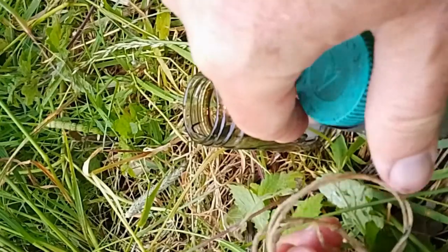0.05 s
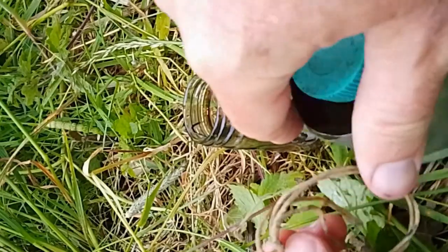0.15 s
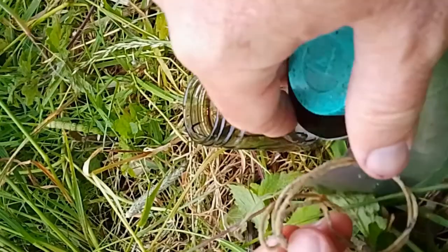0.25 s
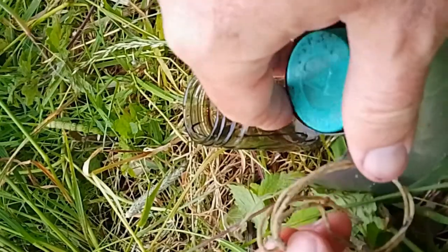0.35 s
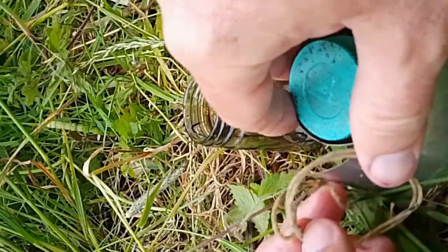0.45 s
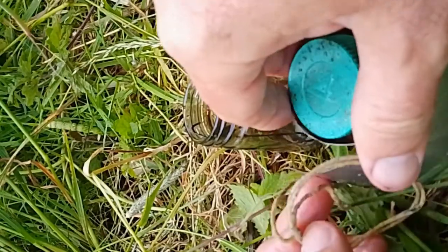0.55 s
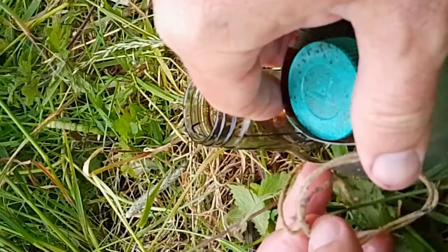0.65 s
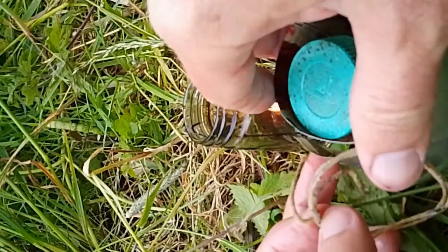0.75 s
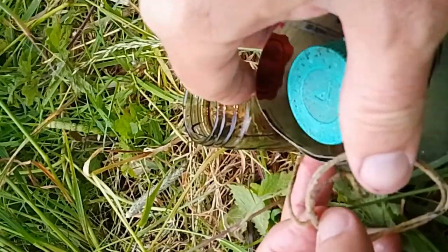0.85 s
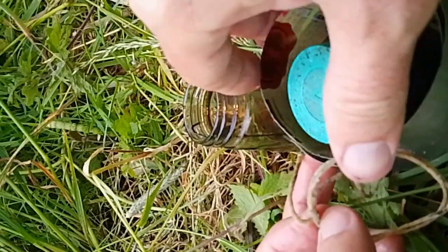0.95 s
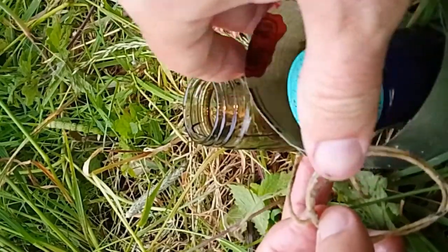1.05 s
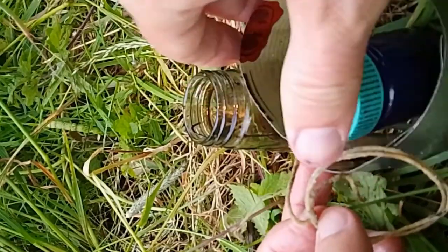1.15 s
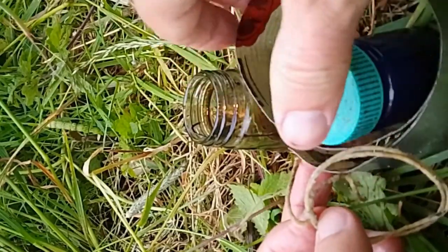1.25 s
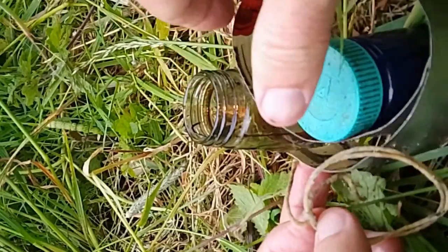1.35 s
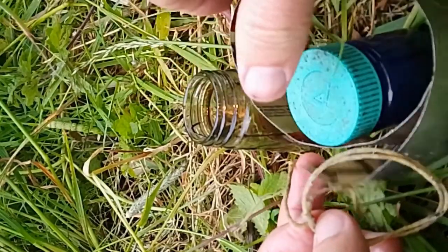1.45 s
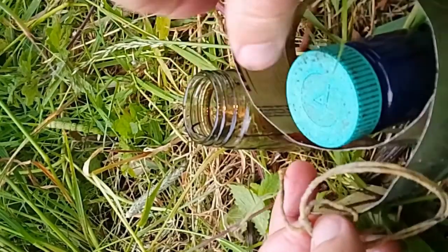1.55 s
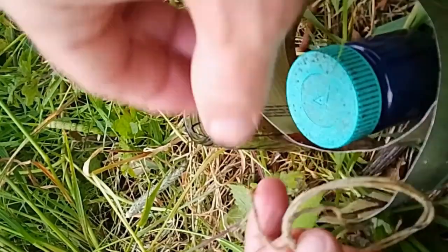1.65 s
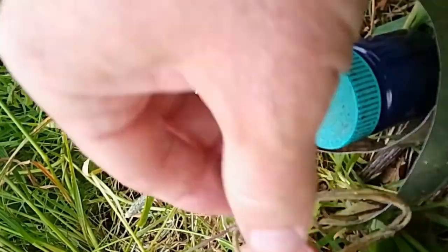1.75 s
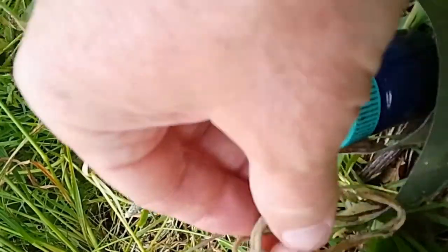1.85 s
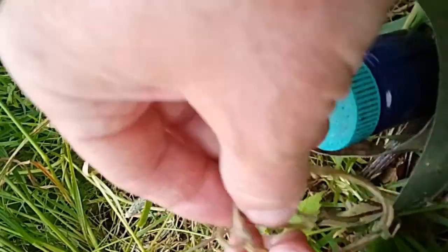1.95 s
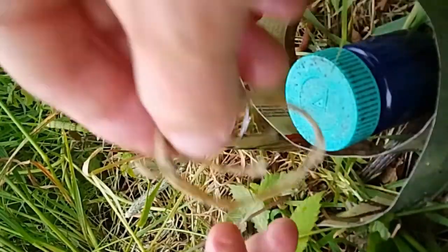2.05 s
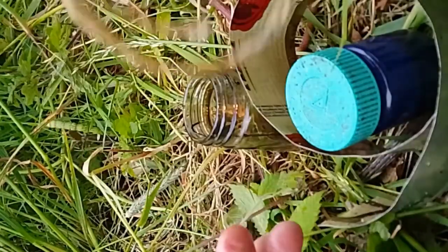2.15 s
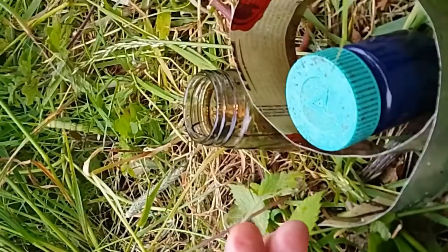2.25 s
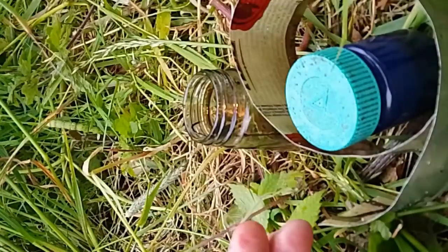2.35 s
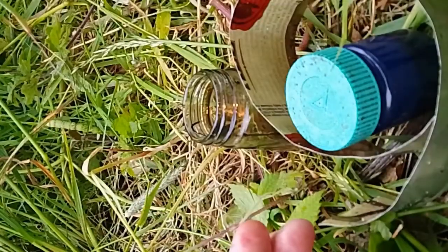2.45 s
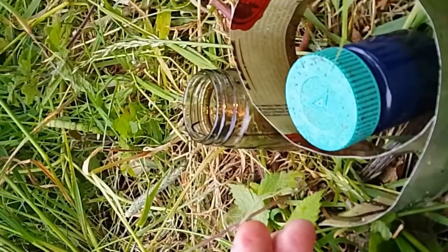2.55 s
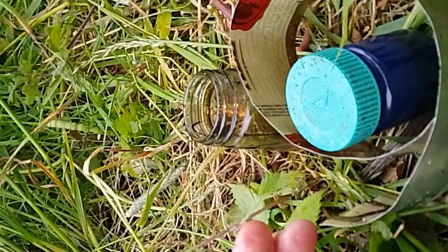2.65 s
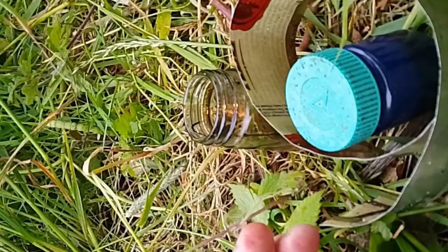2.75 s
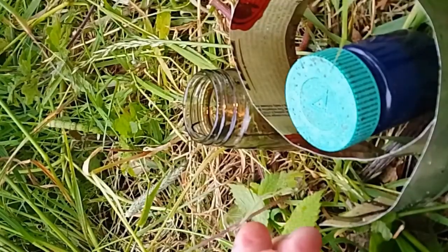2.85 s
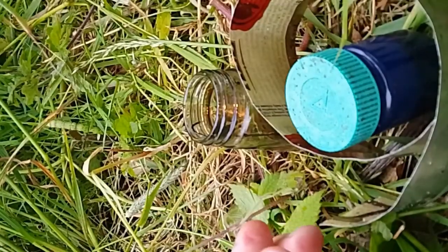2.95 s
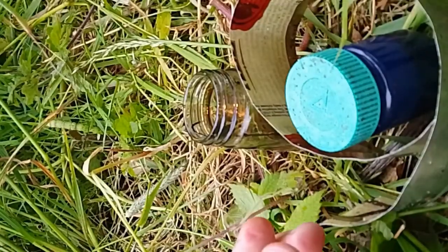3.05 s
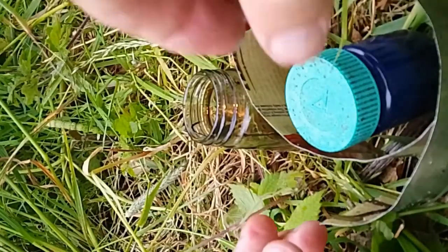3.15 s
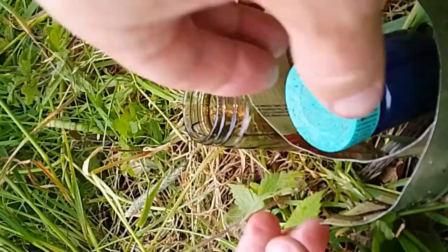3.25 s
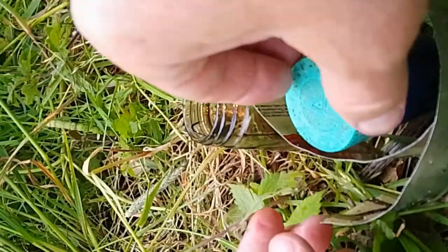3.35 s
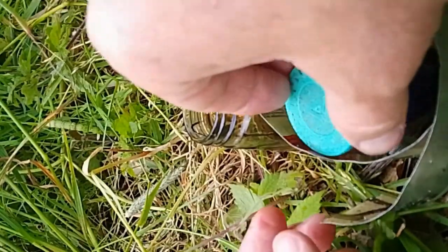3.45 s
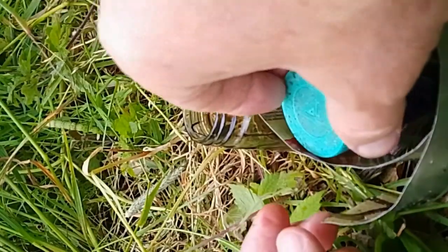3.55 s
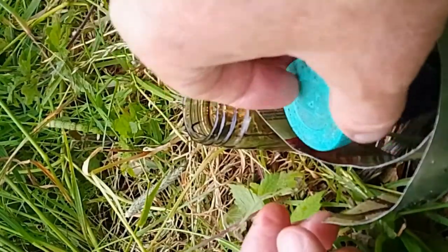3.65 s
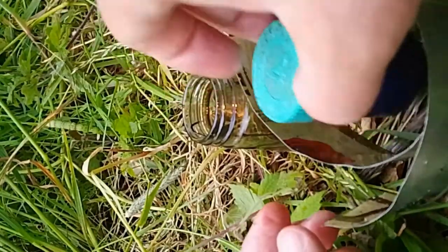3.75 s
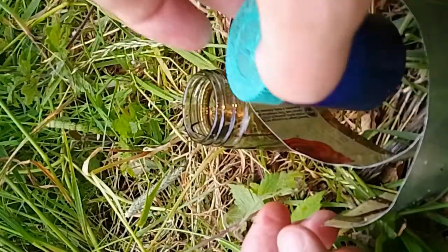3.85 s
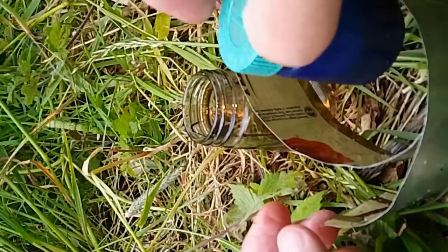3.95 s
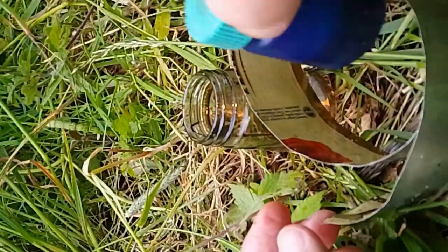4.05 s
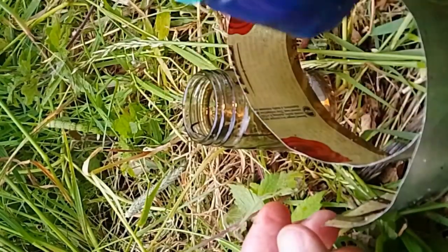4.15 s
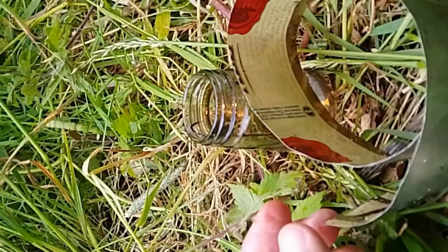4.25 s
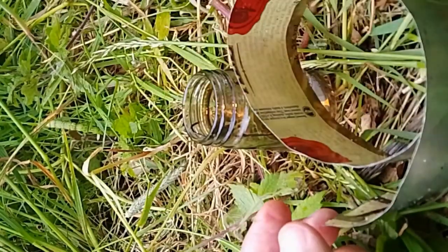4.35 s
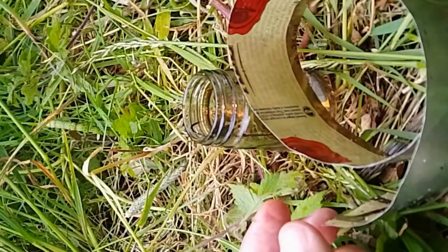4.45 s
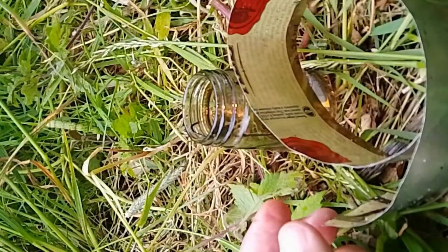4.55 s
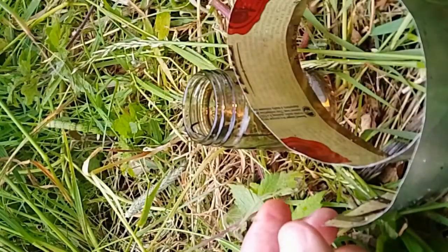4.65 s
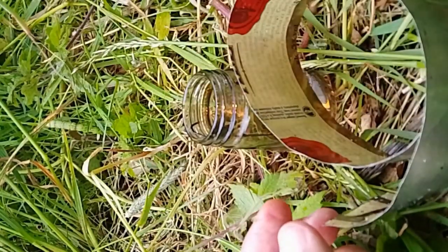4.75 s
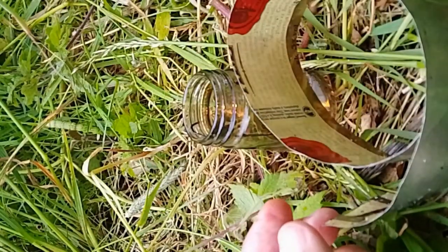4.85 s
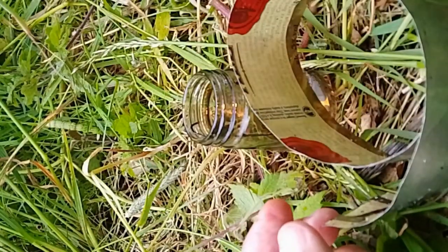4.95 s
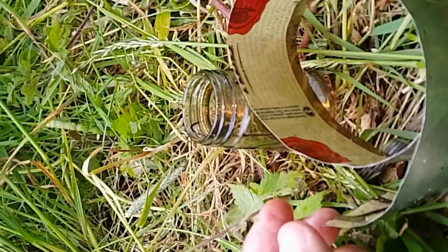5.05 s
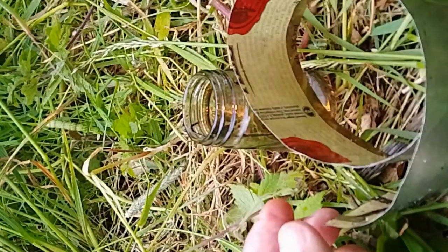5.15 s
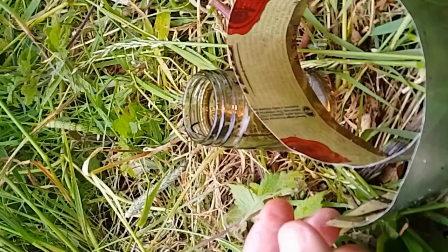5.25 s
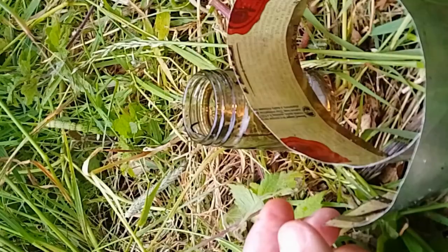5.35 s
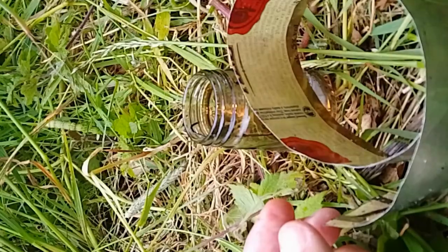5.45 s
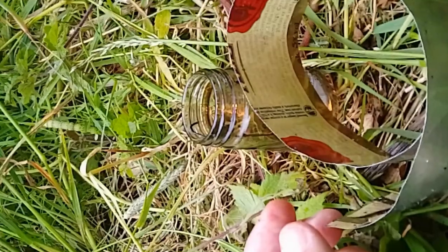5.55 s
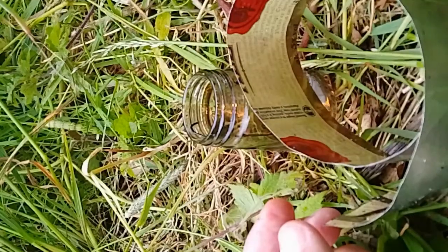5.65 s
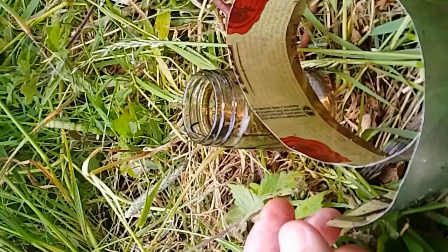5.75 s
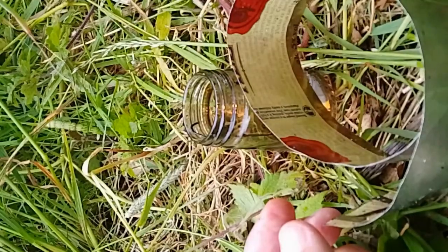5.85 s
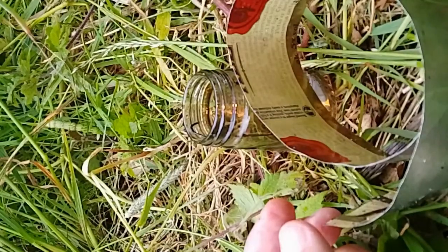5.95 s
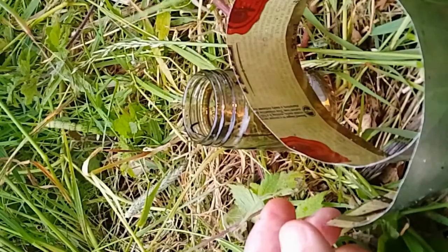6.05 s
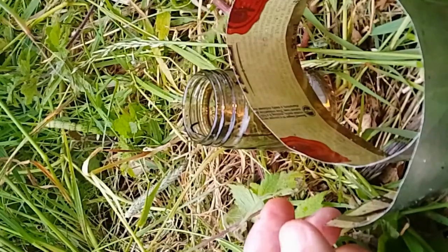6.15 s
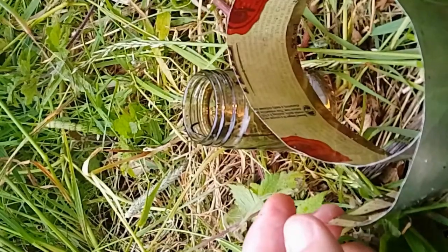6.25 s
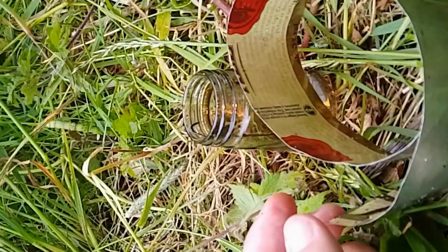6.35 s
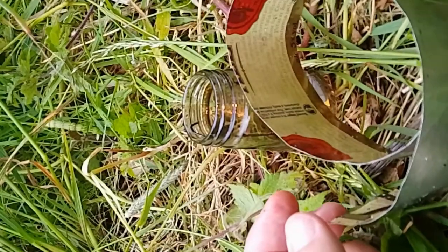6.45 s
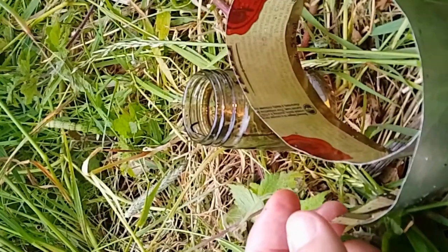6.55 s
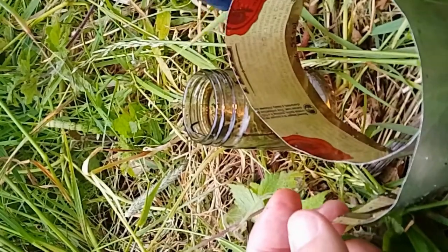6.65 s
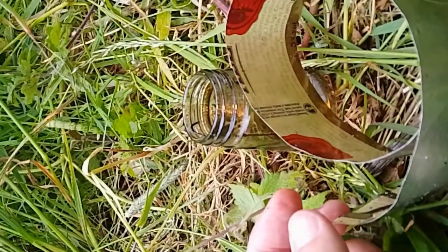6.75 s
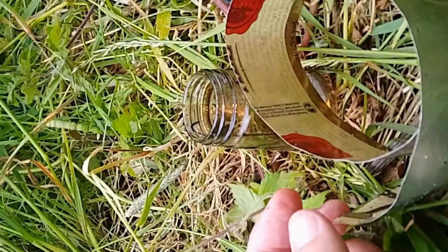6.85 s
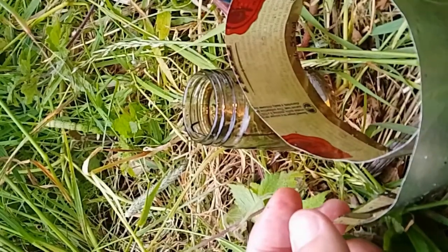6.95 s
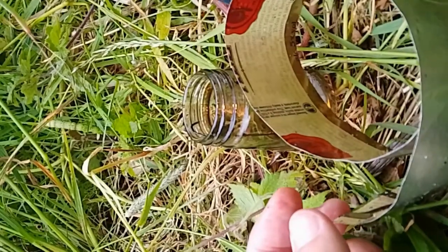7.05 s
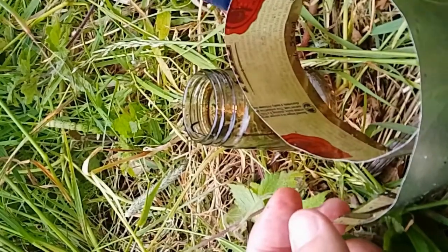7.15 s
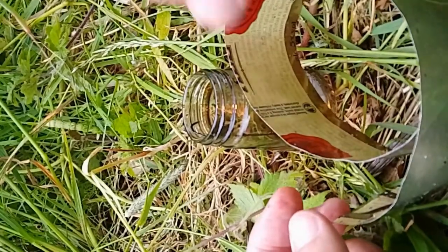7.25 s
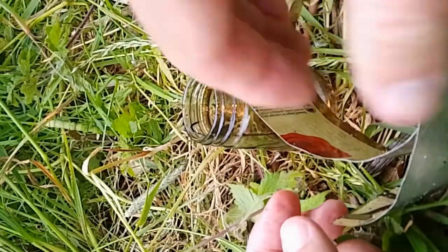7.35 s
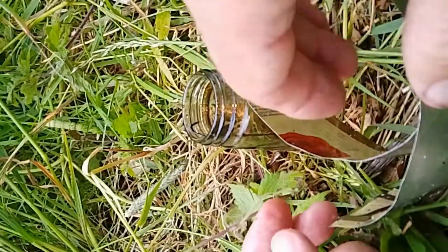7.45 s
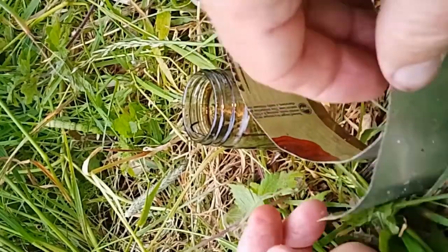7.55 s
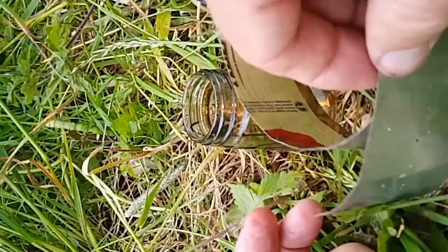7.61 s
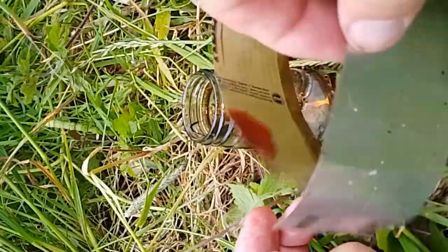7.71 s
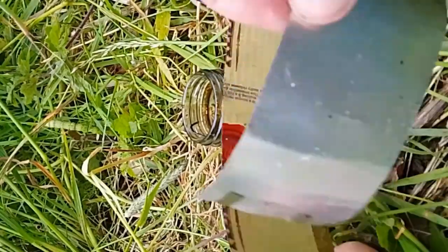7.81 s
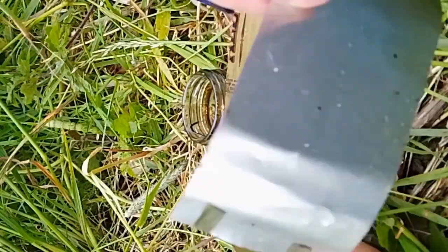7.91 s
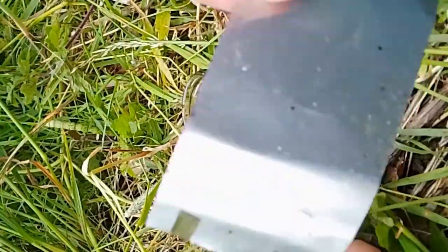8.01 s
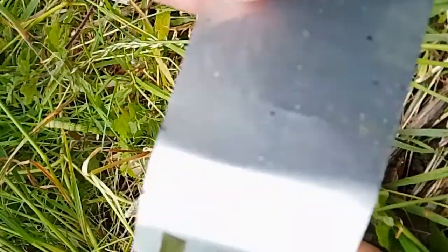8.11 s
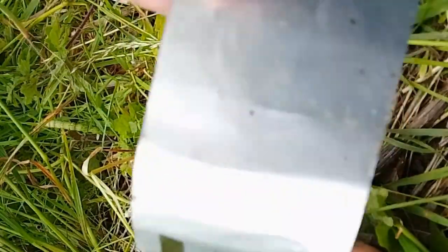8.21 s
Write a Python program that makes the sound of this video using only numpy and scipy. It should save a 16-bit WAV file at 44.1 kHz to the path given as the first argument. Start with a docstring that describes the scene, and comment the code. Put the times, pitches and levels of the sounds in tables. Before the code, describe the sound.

A close microphone outdoors, the same on both sides, catches thin sheet metal sticking and slipping in dry, high scratches, loudest at the very start. Quiet cloth movement and a soft tap follow. A calm stretch holds low wind, fine air hiss, sparse grass ticks and small far-off birds chirping and whistling, before one short metallic scrape near the end and a last faint one.

```python
"""Outdoors in long grass, a hand lifts a small jar out of a curled aluminium wind shield: the thin sheet
catches and slips in short scrapes that squeal in its bending modes. A sleeve then swishes as the arm draws
back and reaches in again, with a soft knock on the way; dry stalks tick now and then. Near the end the hand
picks up the shield and it scrapes again. All along, noise shaped as low wind rumble and a thin hiss of air
runs beneath, and small birds sing far off as gliding tones. One close microphone feeds both channels."""
import sys
import numpy as np
from scipy import signal
from scipy.fft import rfft, irfft
from scipy.io import wavfile
from scipy.ndimage import map_coordinates

SR = 44100
rng = np.random.default_rng(int(sys.argv[2]) if len(sys.argv) > 2 else 0)


def int16_out(signal):
    """Quantize to a 16-bit WAV file."""
    q = np.round(np.clip(np.atleast_2d(signal).T, -1, 1) * 32767)
    wavfile.write(sys.argv[1], SR, q.astype(np.int16))


N = 365148
TIME = np.arange(N) / SR  # seconds

# Catches and slips of the sheet: start_s, rise_s, fall_s, level_db (rms), bend_hz (bending mode),
# body_db (weight of the lower tones, trimmed by pitch in sheet_response)
SCRAPE_STROKES = [(0.078, 0.038, 0.0095, -32, 4010, -1), (0.121, 0.0047, .012, -17.5, 3200, -10.5),
                  (0.144, 0.018, .009, -23, 3280, -0.5), (0.165, 0.0064, 0.0099, -22, 4050, -3),
                  (0.197, 0.0043, 0.014, -34, 3790, 1), (0.218, .016, .006, -35, 3370, -2),
                  (0.249, 0.0013, 0.025, -44, 3320, -4), (0.322, .005, 0.012, -30.5, 3850, -1),
                  (0.388, .004, .016, -53, 3880, 11), (0.414, 0.0086, 0.0064, -36, 3260, 5),
                  (0.605, 0.0041, 0.0084, -33, 3200, -2), (0.618, 0.02, .007, -43, 3160, 6.5),
                  (0.648, 0.0021, 0.0067, -29, 4500, -9), (0.743, 0.01, .007, -48.5, 3400, 1),
                  (0.811, 0.011, 0.011, -31.5, 3960, 0), (0.828, 0.0075, 0.019, -31.5, 4060, 3),
                  (0.94, 0.0087, .01, -54.5, 3010, 21), (1.021, .002, .009, -40.5, 2880, 3.5),
                  (1.031, 0.0043, 0.032, -35.5, 3010, 2), (1.129, 0.0026, 0.012, -44.5, 3900, 6),
                  (1.207, .022, 0.023, -47, 3120, 2), (1.266, 0.016, 0.0087, -52, 4090, -1),
                  (1.295, 0.031, .01, -48.5, 2890, 5), (1.325, 0.011, 0.022, -40.5, 2870, 1),
                  (1.345, 0.018, 0.019, -36.5, 4280, -5), (1.437, 0.0069, 0.013, -47, 2800, -8),
                  (1.452, 0.013, 0.0062, -39.5, 4200, -6), (1.474, 0.0019, 0.0078, -36.5, 2700, -4),
                  (1.844, 0.0042, 0.009, -54.5, 2800, -7), (1.915, 0.016, 0.015, -49.5, 3340, 0),
                  (4.04, 0.046, 0.025, -56.5, 2510, 7), (7.477, .007, 0.034, -57, 3430, 6),
                  (7.709, .003, 0.026, -41.5, 3500, 0), (7.724, 0.0093, 0.0087, -23.5, 3600, 6.5),
                  (7.737, 0.012, 0.0036, -21.5, 3500, 3), (7.749, 0.0066, 0.012, -20, 3800, 1.5),
                  (7.764, 0.0043, 0.018, -26, 3530, 2), (7.779, 0.0027, 0.024, -46, 4130, 20),
                  (7.811, .002, 0.023, -47, 3570, 1), (8.182, .008, .015, -44.5, 3350, 4.5)]
# Broad tone colour of the sheet: pitch_hz, relative_level_db (per Hz)
SHEET_COLOUR = [(240, -75), (400, -23), (665, -21), (752, -17.5), (1120, -13), (1310, -21), (1700, -8.5),
                (2140, -15.5), (2460, -6.5), (3840, -4.5), (4480, -8.5), (7210, 0), (8540, -5.5),
                (15800, -19.5)]
# Modes that ring in every scrape: pitch_hz, width_hz, level_db (over the broad colour)
SHEET_RINGS = [(860, 60, -1), (1080, 70, -19), (1530, 110, -0.5), (3270, 68, 6.5), (3840, 77, 4),
               (4540, 160, 9), (6390, 94, 5), (7660, 120, -18), (8700, 140, -7)]
# Light rubbing of the sheet against jar or fingers: start_s, end_s, middle_level_db (rms)
RUB_SPANS = [(0.511, 0.56, -54.5), (0.681, 1.12, -60.5), (1.403, 1.51, -53.5), (1.6, 1.7, -62),
             (3.721, 3.77, -61.5), (7.569, 7.662, -61.5), (7.828, 8.26, -57)]
# Swishes of the sleeve: start_s, rise_s, fall_s, peak_level_db (rms, before the flutter)
SLEEVE_SWISHES = [(2.09, 0.23, 0.25, -48), (2.71, 0.14, 0.21, -48), (2.93, 0.19, 0.28, -61.5)]
# Tone colour of the cloth: pitch_hz, relative_level_db (per Hz)
CLOTH_COLOUR = [(880, -43), (1500, -15), (2370, -14.5), (2590, -20), (2970, -12.5), (4100, -10.5),
                (6500, 1), (9510, -8), (12400, -16), (15500, -12.5)]
# A soft knock and its rebound: start_s, relative_peak_db
KNOCK_HITS = [(2.7175, -42.5), (2.7214, -39.5), (2.7315, -49)]
# Modes the knock rings with: pitch_hz, relative_level_db, t60_s (time to fade by 60 dB)
KNOCK_RINGS = [(796, -1, 0.034), (1000, -11, 0.033), (2014, -1.5, 0.042), (2480, 1.5, 0.025),
               (3320, -3, .015), (4250, 0.5, 0.022), (4700, 0, 0.015), (6470, -1, 0.014), (7430, -2, .012)]
# Ticks of dry stalks: start_s, peak_level_db
STALK_TICKS = [(1.6597, -42), (4.012, -41), (4.1066, -38), (4.5567, -41), (4.859, -50), (5.49, -42),
               (6.1294, -44), (6.1928, -41), (6.338, -43.5), (6.721, -40.5), (6.738, -47), (6.7494, -48),
               (7.3266, -46), (7.519, -42), (7.648, -43)]
# Plain bird whistles: start_s, length_s, start_pitch_hz, end_pitch_hz, level_db (rms, before the echo)
BIRD_WHISTLES = [(0, 0.067, 4960, 4740, -65), (0.677, 0.072, 3360, 3230, -70), (1.38, .06, 3900, 3830, -66),
                 (1.527, 0.17, 7000, 6870, -61.5), (1.77, .068, 4950, 4960, -67),
                 (1.87, 0.11, 4100, 3620, -71), (1.961, .19, 3440, 3330, -72.5),
                 (3.701, 1.5, 1898, 1854, -81.5), (4.735, 0.16, 4520, 4510, -63),
                 (4.928, 0.2, 7480, 7170, -60.5), (4.991, .13, 1275, 1377, -73),
                 (5.78, .11, 4450, 4120, -72), (5.889, 0.099, 3300, 3040, -66),
                 (6.256, 0.076, 4900, 4650, -70), (6.363, 0.082, 4500, 3950, -66),
                 (6.502, 0.095, 3480, 3160, -60.5), (6.82, .17, 4880, 4070, -69.5),
                 (7.038, .12, 3274, 3000, -64), (7.44, 0.19, 4750, 4140, -68)]
# Buzzy falling bird notes: start_s, length_s, start_pitch_hz, end_pitch_hz, level_db (rms, before the echo)
BIRD_TRILLS = [(4.465, .1, 7360, 5750, -66), (4.61, 0.093, 7600, 5920, -62),
               (5.186, 0.063, 5930, 5300, -61), (5.765, 0.072, 6900, 6250, -61.5)]
# Pitch path of a chirp: share_of_syllable, pitch_hz
CHIRP_PATH = [(0, 4400), (.27, 6100), (.42, 6420), (1, 5950)]
# Pitch path of a twitter: share_of_syllable, pitch_hz
TWITTER_PATH = [(0, 5730), (1, 4280)]
# Pitch path of a slurred note: share_of_syllable, pitch_hz
SLUR_PATH = [(0, 8050), (.5, 7600), (1, 6900)]
# Slow swells of the upper wind rumble: time_s, relative_gain_db
WIND_SWELLS = [(0.0, -50.5), (0.67, -57.5), (1.38, -53.5), (1.4, -56.5), (1.68, -49.5), (3.41, -52.5),
               (3.74, -46), (3.76, -50.5), (3.99, -52), (4.1, -46.5), (4.34, -54.5), (4.84, -58),
               (5.33, -52.5), (6.5, -54.5), (7.08, -50), (7.31, -57.5), (7.61, -52.5), (8.28, -56.5)]
# Tone colour of the rumble: pitch_hz, relative_level_db (per Hz)
RUMBLE_COLOUR = [(12, -58), (20, -9), (91, -5), (192, -2.5), (216, -2.5), (270, -16), (304, -17),
                 (338, -17.5), (468, -19), (552, -25), (700, -30), (910, -63), (1540, -120)]
# Swells of the air in the grass: time_s, level_db (rms, before a small random wander)
BREEZE_SWELLS = [(0, -59.5), (1.8, -64), (2.2, -58), (2.58, -62), (3.15, -56.5), (3.5, -63), (4.15, -61.5),
                 (4.4, -64.5), (5.0, -64), (5.45, -59.5), (5.7, -63), (7.3, -64), (8.28, -57.5)]
# Tone colour of that air: pitch_hz, relative_level_db (per Hz)
AIR_COLOUR = [(350, -16), (600, -3.5), (660, -4.5), (982, -2), (1290, -4.5), (1950, -6.5), (3230, -9),
              (4250, -8), (5430, -7), (7050, -3.5), (10500, -14.5), (15800, -16)]

# A harder push squeals higher and brings out the bright edge; both are given for a scrape of MEDIUM_DB.
MEDIUM_DB = -34
SQUEAL_HZ, SQUEAL_HZ_PER_DB = 6930, 44
SQUEAL_SPREAD_HZ = 390  # the curl of the sheet differs from scrape to scrape
EDGE_DB, EDGE_PER_DB = -2.5, 0.17
RUB_PER_S, RUB_RISE_S, RUB_FALL_S, RUB_SCATTER_DB = 28, 0.0203, 0.023, 8.5
RUB_BEND_HZ, RUB_BEND_SPREAD_HZ, RUB_BODY_DB = 3380, 570, 5
# Whistles and trills bow upwards in mid-note by a share of their pitch; wide glides bow more.
WHISTLE_ARCH, ARCH_PER_GLIDE = .01, 0.126
TRILL_PER_GLIDE = 0.27  # the wider the fall, the deeper the trill
SCOOP, SCOOP_S = 0.069, 0.00793  # a note slides up from this share below its pitch, in about this time
RUN_FADE_DB = 3.5  # how much softer a run is at its ends
SYLLABLE_SCATTER_DB, SYLLABLE_DRIFT = 2, 0.0082  # random spread in level, and in pitch as a share
STEADY_HZ, STEADY_GAIN_DB = 112, -51.5  # the rumble below this pitch keeps a steady gain
TOP_HZ = 15900


def shield():
    """The aluminium sheet sounds each time it catches and slips."""
    out = np.zeros(N)
    for start, *stroke in SCRAPE_STROKES:
        add(out, start, pushed_scrape(*stroke))
    return out


def pushed_scrape(rise, fall, db, bend_hz, body_db):
    """One scrape whose squeal and brightness follow how hard the sheet is pushed."""
    push = db - MEDIUM_DB
    squeal_hz = SQUEAL_HZ + SQUEAL_HZ_PER_DB * push + SQUEAL_SPREAD_HZ * rng.uniform(-1, 1)
    edge_db = EDGE_DB + EDGE_PER_DB * push
    sheet = sheet_response(squeal_hz, bend_hz, body_db, edge_db)
    return scrape(rise, fall, db, sheet)


def scrape(rise, fall, db, sheet, foot_db=-13, end_db=-17, ring_t60=.09, ring_db=-13):
    """Pressure builds and lets go; the slips ring the sheet, which shimmers on briefly."""
    t = np.arange(int((rise + fall) * SR)) / SR
    pressure_db = np.interp(t, [0, rise, rise + fall], [foot_db, 0, end_db])
    pressure_db += 2.0 * walk(len(t), 109.3)
    force = slips(len(t), rate=7000, scatter_db=4.0) * undb(pressure_db)

    after = np.arange(SR // 10) / SR
    shimmer = rng.standard_normal(len(after)) * undb(-60 * after / ring_t60)
    shimmer *= undb(ring_db) / np.linalg.norm(shimmer)
    shimmer[0] = 1  # the direct sound
    ringing = signal.fftconvolve(force, sheet)
    y = signal.fftconvolve(ringing, shimmer)
    # the level is set over the stroke, leaving out the tail
    return y * undb(db) / np.sqrt(np.mean(y[:len(t)] ** 2) + 1e-20)


def sheet_response(squeal_hz, bend_hz, body_db, edge_db, size=2048):
    """The sheet as it is held just now: curl and contact point shift its modes and their weights."""
    hz = np.fft.rfftfreq(size, 1 / SR)
    power = 1 + sum(undb(db) ** 2 * resonance(hz, f, width) for f, width, db in SHEET_RINGS)
    power += undb(4.5) ** 2 * resonance(hz, squeal_hz, 274)
    power += undb(10.0) ** 2 * resonance(hz, bend_hz, 185)
    body = [(250, body_db - 10.0), (700, body_db - 2.5), (2000, body_db + 0.5)]
    contact = body + [(2800, -4.5), (4100, -6), (5200, 0.0056), (8500, 0.006), (11000, edge_db)]
    crowded_modes = 2.65 * walk(len(hz), 7)  # many small uneven peaks and dips
    broad_db = colour_db(SHEET_COLOUR, hz) + colour_db(contact, hz)
    return response(broad_db + 10 * np.log10(power) + crowded_modes)


def resonance(hz, centre_hz, width_hz):
    """Power response of one mode, 1 at its centre."""
    return 1 / (1 + (2 * (hz - centre_hz) / width_hz) ** 2)


def slips(count, rate, scatter_db):
    """Stick and slip: tiny clicks of uneven size at random moments, about rate of them a second."""
    spread = np.clip(rng.standard_normal(count), -2, 2)
    size = undb(scatter_db * spread) * rng.choice([-1, 1], count)
    return size * (rng.random(count) < rate / SR)


def rubbing():
    """Between the catches the sheet slides on in faint, uneven little scrapes."""
    out = np.zeros(N)
    for start, end, db in RUB_SPANS:
        times = np.arange(start, end - RUB_RISE_S, 1 / RUB_PER_S)
        chances = rng.uniform(-1, 1, (len(times), 3))
        for s, (late, force, curl) in zip(times, chances):
            rub_db = db + RUB_SCATTER_DB * force
            bend_hz = RUB_BEND_HZ + RUB_BEND_SPREAD_HZ * curl
            y = pushed_scrape(RUB_RISE_S, RUB_FALL_S, rub_db, bend_hz, RUB_BODY_DB)
            add(out, s + .5 * late / RUB_PER_S, y)
    return out


def sleeve(flutter_db=1.0):
    """Cloth hisses in step with the speed of the arm."""
    speed = np.zeros(N)
    for start, rise, fall, db in SLEEVE_SWISHES:
        phase = np.interp(TIME - start, [0, rise, rise + fall], [0, np.pi / 2, np.pi])
        speed += undb(db) * np.sin(phase) ** 2
    flutter = undb(flutter_db * walk(N, SR / 40))
    return noise(CLOTH_COLOUR) * speed * flutter


def knock(contact_t60=0.0072):
    """A small dull knock: a rough contact pushes a few damped modes."""
    out, t = np.zeros(N), np.arange(SR // 10) / SR
    ring = sum(undb(db - 60 * t / t60) * np.sin(2 * np.pi * hz * t) for hz, db, t60 in KNOCK_RINGS)
    for start, db in KNOCK_HITS:
        contact = rng.standard_normal(len(t)) * undb(-60 * t / contact_t60)
        y = signal.fftconvolve(contact, ring)
        add(out, start, y * undb(db + 9.5) / np.abs(y).max())
    return out


def stalks(t60=0.061):
    """A dry stalk gives way in a short run of fibre snaps."""
    out, t = np.zeros(N), np.arange(SR // 20) / SR
    hz = np.fft.rfftfreq(512, 1 / SR)
    straw_colour = [(500, -25), (2500, -2.5), (7000, 6.0), (10000, -1.5), (15000, -13)]
    for start, db in STALK_TICKS:
        straw = response(colour_db(straw_colour, hz) + 3 * walk(len(hz), 5.5))
        snaps = slips(len(t), rate=3000, scatter_db=3) * undb(-60 * t / t60)
        y = signal.fftconvolve(snaps, straw)
        add(out, start, y * undb(db) / np.abs(y).max())
    return out


def birds(echo_t60=0.48, echo_db=-4.5):
    """Gliding whistles, trills and runs of chirps, scattered by the trees on their way."""
    out = song(CHIRP_PATH, start=5.893, period=.157, length=.095, db=-62.5, count=6)
    out += song(SLUR_PATH, start=3.3, period=.265, length=.12, db=-73.5, count=4)
    out += song(TWITTER_PATH, start=3.37, period=.06, length=.055, db=-69.5, count=13, trill_depth_hz=297)
    for notes, buzz in (BIRD_WHISTLES, 0), (BIRD_TRILLS, TRILL_PER_GLIDE):
        for s, length, start_hz, end_hz, db in notes:
            glide = abs(start_hz - end_hz)
            arch = WHISTLE_ARCH + ARCH_PER_GLIDE * glide / start_hz
            add(out, s, note(length, db, [(0, start_hz), (1, end_hz)], arch, buzz * glide))
    t = TIME[:SR]
    trees = rng.standard_normal(len(t)) * undb(-60 * t / echo_t60)
    echo = signal.fftconvolve(out, trees / np.linalg.norm(trees))[:N]
    return out + undb(echo_db) * echo


def song(pitch, start, period, length, db, count, trill_depth_hz=0):
    """A bird repeats one syllable at an even pace (times in s), softer at both ends of the run."""
    out = np.zeros(N)
    places = np.linspace(-1, 1, count)
    chances = rng.standard_normal((count, 2))
    for k, (place, (effort, drift)) in enumerate(zip(places, chances)):
        sung = [(share, hz * (1 + SYLLABLE_DRIFT * drift)) for share, hz in pitch]
        sung_db = db - RUN_FADE_DB * place ** 2 + SYLLABLE_SCATTER_DB * effort
        add(out, start + k * period, note(length, sung_db, sung, 0, trill_depth_hz))
    return out


def note(length, db, pitch, arch=0, trill_depth_hz=0, trill_hz=110):
    """One whistled note that scoops up, then swells and fades along its pitch path."""
    u = np.linspace(0, 1, int(length * SR))  # share of the note
    bend = arch * np.sin(np.pi * u) - SCOOP * np.exp(-length * u / SCOOP_S)
    waver = 0.0034 * walk(len(u), 296)
    hz = np.interp(u, *np.transpose(pitch)) * (1 + bend + waver)
    hz = hz + trill_depth_hz * np.sin(2 * np.pi * trill_hz * length * u)
    swell = np.sqrt(np.abs(np.sin(np.pi * u))) * undb(2.0 * walk(len(u), 900))
    return level(swell * np.sin(2 * np.pi * np.cumsum(hz) / SR), db)


def wind():
    """A low rumble whose upper part swells slowly, and a thin hiss of air in the grass."""
    rumble = noise(RUMBLE_COLOUR)
    low_pass = signal.butter(3, STEADY_HZ, fs=SR, output="sos")
    deep = signal.sosfiltfilt(low_pass, rumble)
    gusts = (rumble - deep) * undb(curve(WIND_SWELLS) + 1.63 + 1.1 * walk(N, SR / 9))
    hiss = noise(AIR_COLOUR) * undb(curve(BREEZE_SWELLS) + .5 * walk(N, SR / 14))
    return undb(STEADY_GAIN_DB) * deep + gusts + hiss


def noise(points):
    """Noise of rms 1 with a given spectrum."""
    hz = np.fft.rfftfreq(N, 1 / SR)
    spectrum = rfft(rng.standard_normal(N)) * undb(colour_db(points, hz))
    return level(irfft(spectrum, N), 0)


def response(db):
    """The causal, quickest (minimum-phase) impulse response with this gain over frequency."""
    cepstrum = irfft(np.log(undb(db)))
    half = len(cepstrum) // 2
    # folding the second half onto the first puts the energy as early as possible
    cepstrum[1:half] *= 2
    cepstrum[half + 1:] = 0
    return irfft(np.exp(rfft(cepstrum)))


def walk(count, step):
    """A smooth random wander of spread near 1 through a new random value every step points."""
    knots = rng.standard_normal(int(count / step) + 4)
    return map_coordinates(knots, [np.arange(count) / step + 1], order=3, mode="nearest")


def colour_db(points, hz):
    """Read a table of pitch in Hz and level in dB on a log-frequency axis."""
    f, db = np.transpose(points)
    return np.interp(np.log(hz + 1), np.log(f), db)  # the +1 avoids log(0)


def curve(rows):
    """Join rows of time in s and value by straight lines."""
    return np.interp(TIME, *np.transpose(rows))


def undb(db):
    """Turn decibels into gain."""
    return 10 ** (np.asarray(db) / 20)


def level(x, db):
    """Scale a sound to an rms level in dB."""
    return x * undb(db) / np.sqrt(np.mean(x ** 2) + 1e-20)


def add(out, s, x):
    """Mix x into out from time s (seconds) on."""
    i = max(int(s * SR), 0)
    out[i:i + len(x)] += x[:max(N - i, 0)]


def scene():
    """Everything reaches one microphone, heard the same on both channels."""
    mono = shield() + rubbing() + sleeve() + knock() + stalks() + birds() + wind()
    return np.array([mono, mono])


def record(dry):
    """The recorder steeply cuts everything above TOP_HZ."""
    low_pass = signal.ellip(10, .2, 80, TOP_HZ, fs=SR, output="sos")
    return signal.sosfilt(low_pass, dry)


dry = scene()
out = record(dry)
int16_out(out)
```